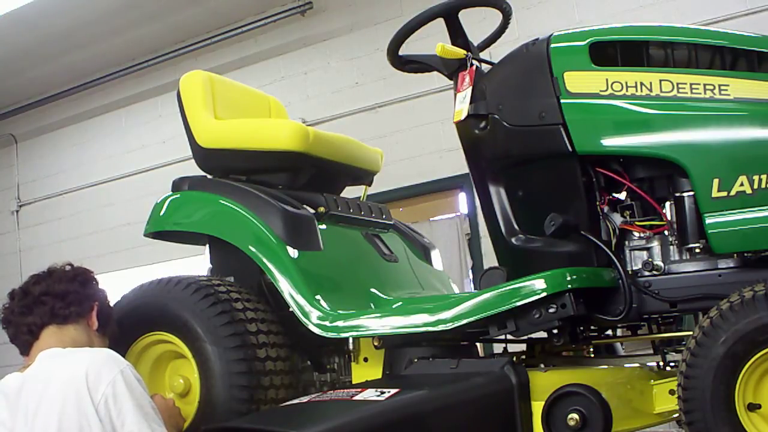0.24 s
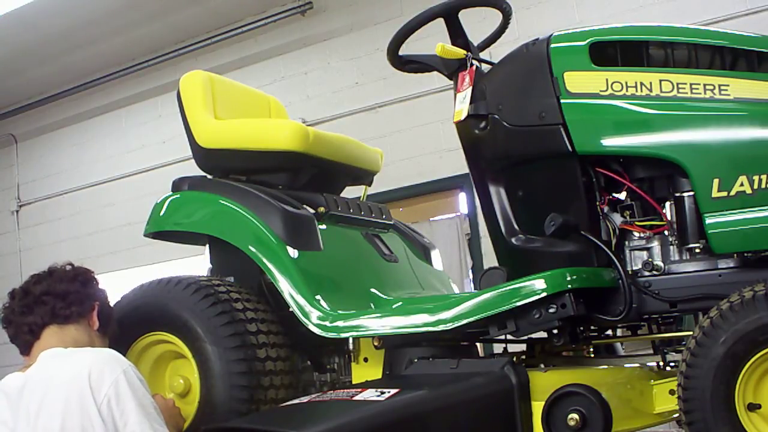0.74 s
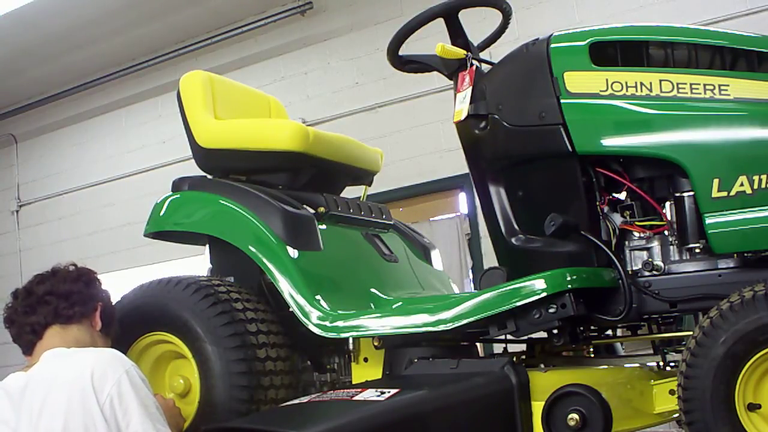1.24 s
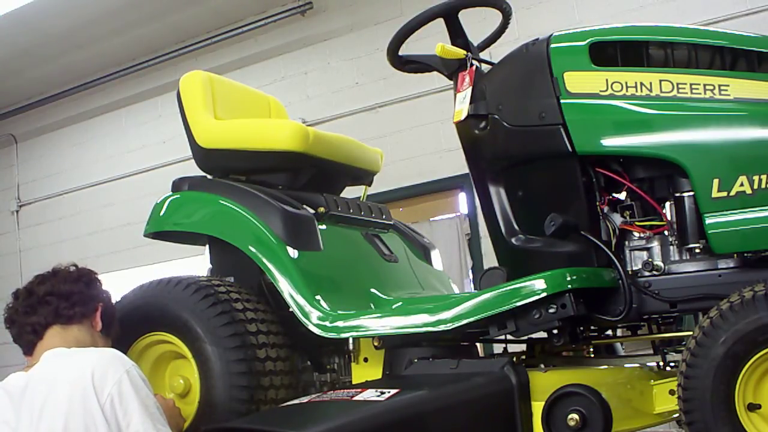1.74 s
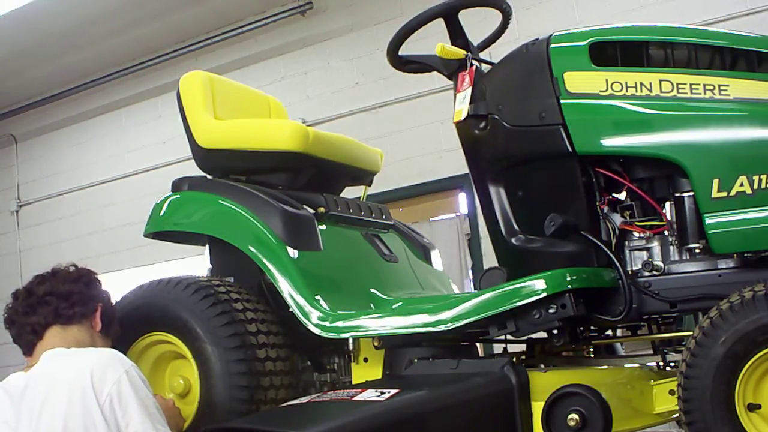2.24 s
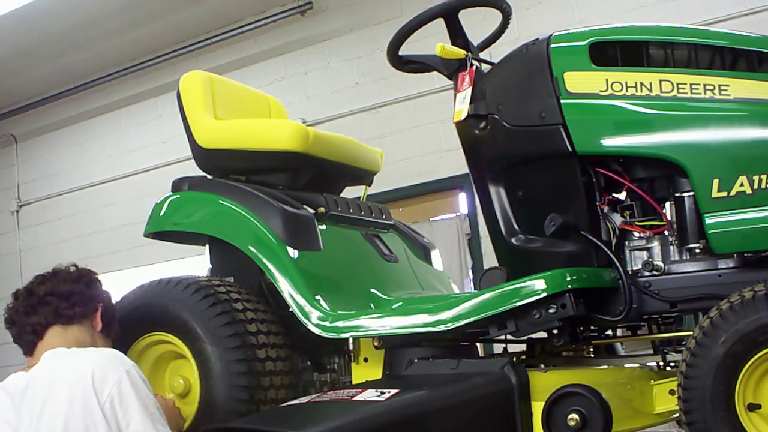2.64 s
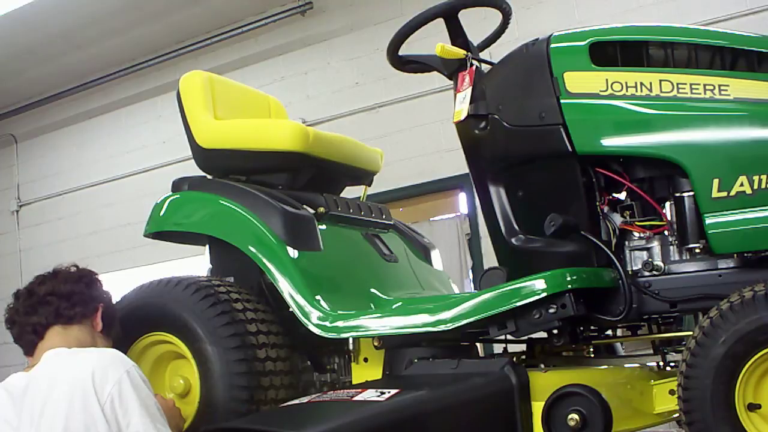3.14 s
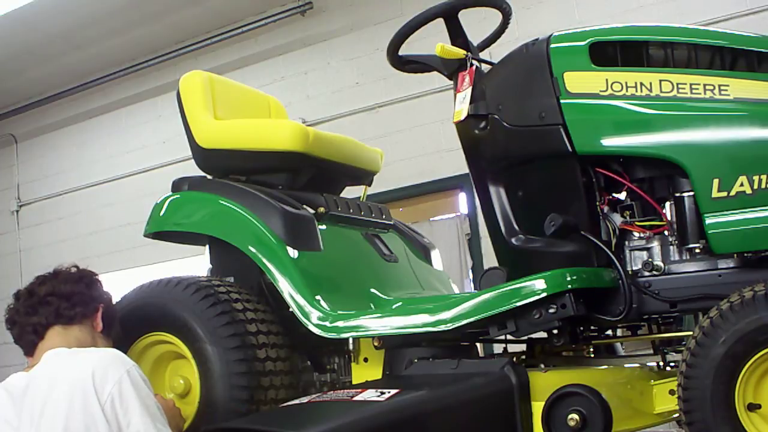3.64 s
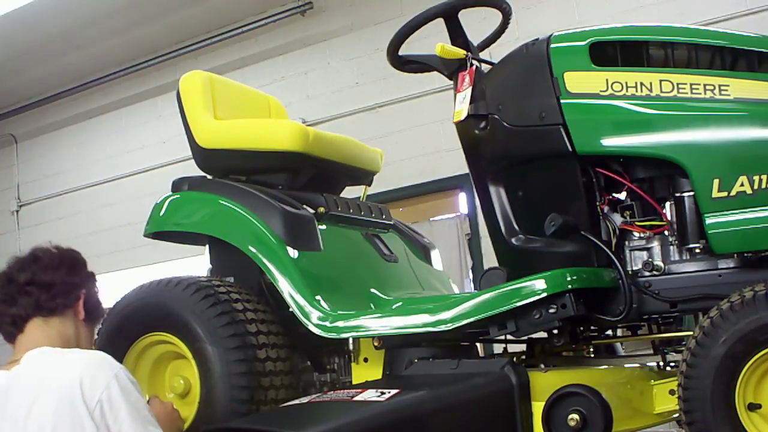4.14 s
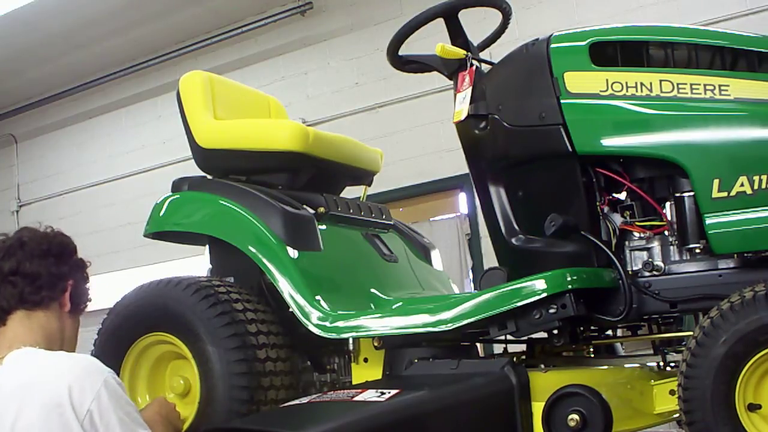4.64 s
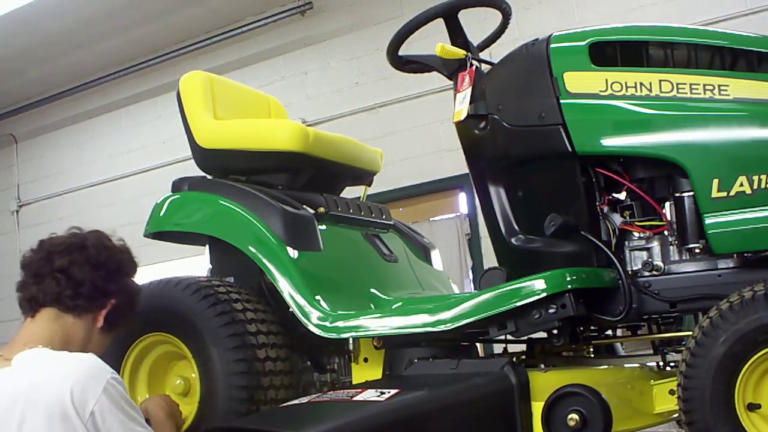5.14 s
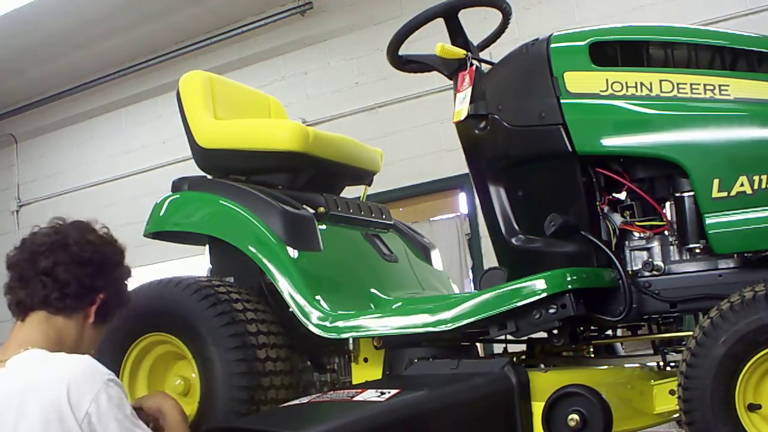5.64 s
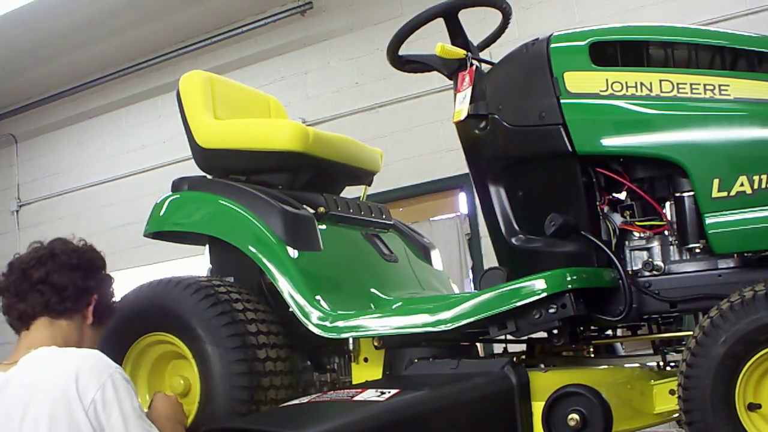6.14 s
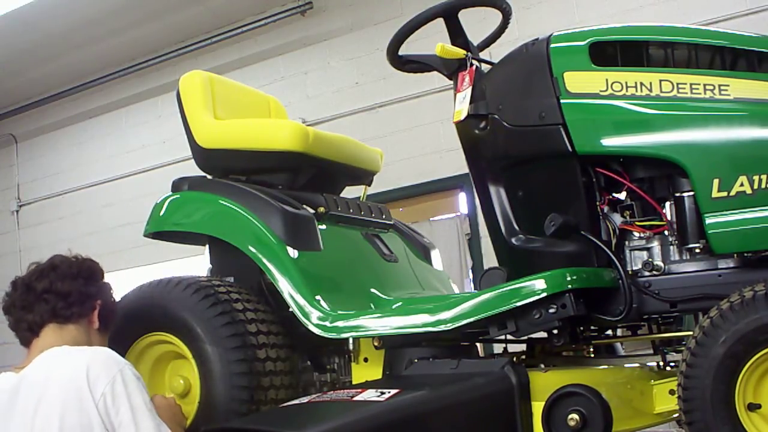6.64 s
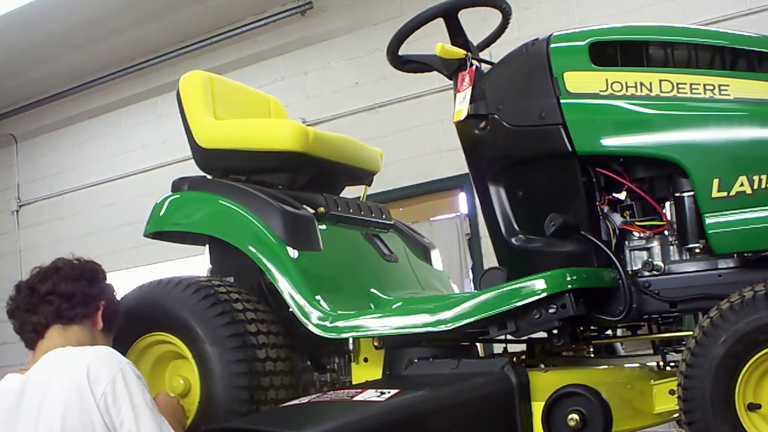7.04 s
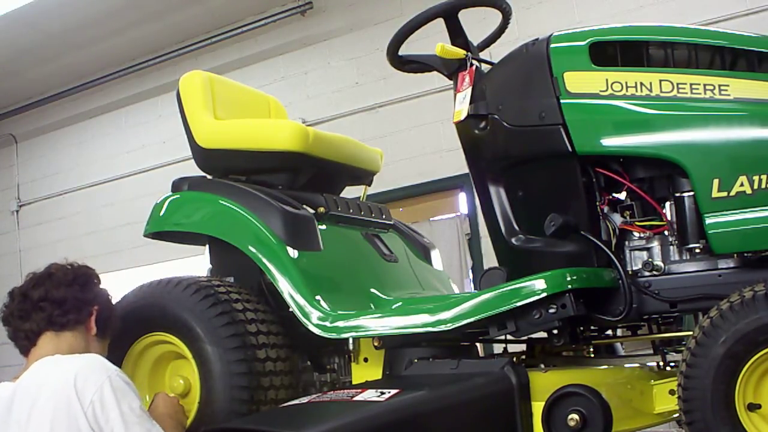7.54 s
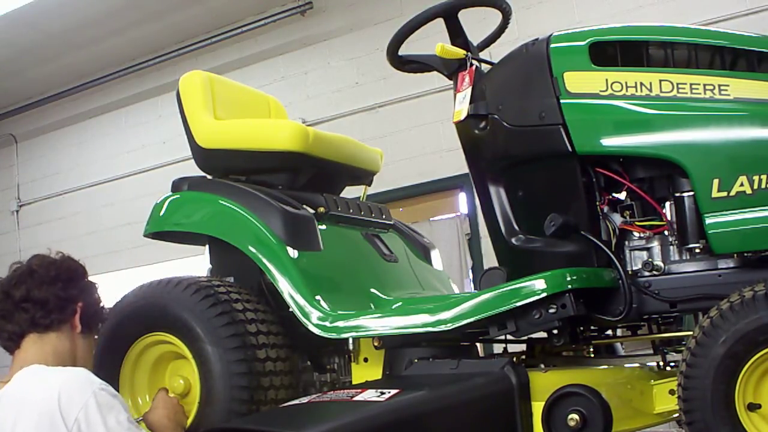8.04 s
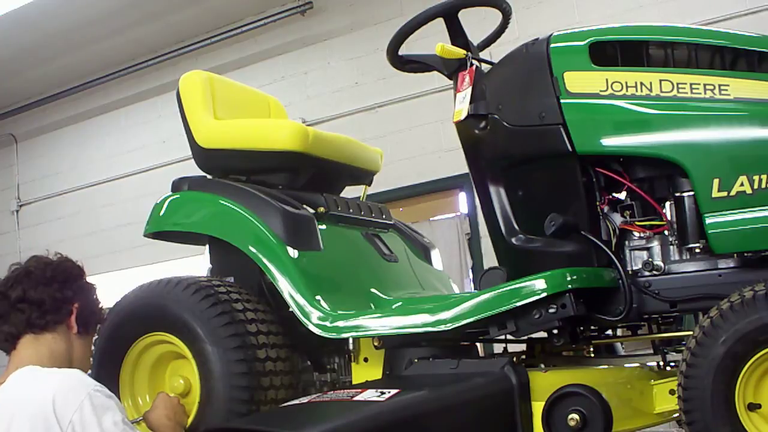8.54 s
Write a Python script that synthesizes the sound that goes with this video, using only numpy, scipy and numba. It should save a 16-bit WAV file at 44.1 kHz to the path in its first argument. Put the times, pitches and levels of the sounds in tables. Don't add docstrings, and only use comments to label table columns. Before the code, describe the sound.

In a hard-walled workshop, a sharp hiss of escaping air stops, puffs once, ticks, then resumes steadily above throbbing fan motors.

```python
import sys
import numpy as np
from scipy import signal
from scipy.fft import rfft, irfft, next_fast_len
from scipy.io import wavfile
from scipy.ndimage import uniform_filter1d
from numba import njit

SR = 44100
rng = np.random.default_rng(int(sys.argv[2]) if len(sys.argv) > 2 else 0)


def volts(x):
    e = np.asarray(x, float) / 20
    return 10 ** e


def transcribe(signal):
    frames = np.atleast_2d(signal).T
    limited = np.clip(frames, -1, 1)
    pcm = np.round(limited * 32767).astype(np.int16)
    wavfile.write(sys.argv[1], SR, pcm)


N = 387198

# (valve opens [s], shuts [s], jet whistle [dB], sag as pressure falls [dB/s])
RELEASES = [
    (-1, 4.08, -33.9, 1.1),
    (5.47, 5.66, -52, 45),
    (6.828, 9, -34, -.4),
]
# (start [s], length [s], extra level [dB])
JET_SURGES = [
    (3.83, 0.3, 7),
    (5.495, .07, 9),
    (6.819, .3, 2.5),
    (7.199, .65, 1.8),
    (8.2, .42, 2.2),
]
# (time [s], whistle centre [Hz])
WHISTLE_CENTRE = [(0, 7210), (3.94, 7580), (4.08, 6850), (5.5, 7080), (6.85, 7020), (7.5, 6880),
                  (7.85, 6720), (8.78, 6760)]
# (frequency [Hz], width [Hz], level [dB])
CHUCK_CAVITIES = [(6220, 370, -6.5), (6740, 320, -1.5), (7360, 750, -4), (7925, 300, 2.5)]
# (frequency [Hz], density [dB per Hz])
STEM_SPECTRUM = [(500, -15.5), (900, -14.5), (1350, 3.5), (1800, -6), (2400, -1), (3200, -4), (4000, -9),
                 (5000, -13.5)]
# (multiple of its speed, level re first [dB])
FAST_PARTIALS = [(3, -28.5), (4, -32.5), (5, -38), (6, -41), (7, -44), (8, -37), (9, -38), (10, -28),
                 (11, -42), (12, -38), (17, -52.5), (19, -45.5), (20, -47.5), (21, -47), (27, -41.5)]
# (multiple of shaft speed, level [dB])
SHAFT_PARTIALS = [(1, -49), (3, -54), (5, -51), (12, -59), (21, -66)]
# (time [s], slower motor level [dB])
BEAT_LOWS = [(-.5, -35), (.23, -35), (.97, -36.5), (1.65, -36.5), (2.25, -34.5), (2.98, -38), (3.73, -34),
             (4.4, -38), (5.13, -36), (5.74, -36.5), (6.51, -35.5), (7.3, -36.5), (8.2, -37.5),
             (9.1, -37.5)]
# (multiple of mains frequency, level [dB])
MAINS_PARTIALS = [(3, -62), (4, -53), (6, -62.5), (8, -65.5)]
# (frequency [Hz], level [dB])
PUMP_NOTES = [(297.7, -59), (1135.5, -66)]
# (frequency [Hz], density [dB per Hz])
SHOP_SPECTRUM = [(20, 3), (70, 1), (105, -2.5), (125, -7), (155, -10), (250, -3), (340, -7.5), (430, -12),
                 (600, -7), (800, -12), (1700, -17.5), (2200, -16), (2800, -20.5), (9000, -26.5)]
# (start [s], end [s], first pitch [Hz], last pitch [Hz], loudest level [dB])
ENGINES = [
    (1, 1.7, 127, 124.5, -37.5),
    (3.5, 5.3, 126, 124.4, -51),
    (-0.6, 1.7, 80.5, 77, -45),
    (3, 3.8, 78, 72, -43),
    (3.8, 5, 74, 81, -53),
    (3.5, 4.5, 99, 120, -52),
    (2.9, 3.7, 38.8, 41.3, -54),
    (2.5, 2.4, 44.3, 48, -47),
]
# (time [s], ring peak [dB], ring [Hz], knock level [dB])
CONTACTS = [
    (5.5353, -34, 6950, -44),
    (5.6536, -47, 7710, -53),
    (6.5064, -33.5, 6230, -53),
    (6.7987, -43.5, 7710, -51),
]
# (frequency [Hz], gain [dB])
MIC_RESPONSE = [(20, -1), (2800, 0), (3500, -4), (3950, -11), (4200, -24.5), (4500, -8.5), (5400, -1.5),
                (7500, 2.5), (7800, 0.5), (8000, -1.5)]
# (frequency [Hz], gain [dB])
CONVERTER_SMOOTHING = [(7000, 0), (7700, -2), (8000, -7.5), (8290, -10.5), (8500, -16.5), (8750, -26),
                       (9000, -37.5), (9250, -60)]

FAST_HZ, SLOW_SHAFT_HZ, MAINS_HZ = 57.665, 28.12, 60.01
FAST_DB = -25
THROB_S = .195


def level(x, db):
    return x * volts(db) / np.sqrt(np.mean(x ** 2))


def colour(x, points):
    size = next_fast_len(len(x))
    hz, db = np.transpose(points)
    log_hz = np.log(np.fft.rfftfreq(size, 1 / SR) + 1)
    gain = volts(np.interp(log_hz, np.log(hz), db))
    return irfft(rfft(x, size) * gain, size)[:len(x)]


def walk(rate):
    hold = max(int(SR / rate), 1)
    steps = np.repeat(rng.standard_normal(N // hold + 1), hold)
    slewed = uniform_filter1d(uniform_filter1d(steps, hold), hold)
    return np.sqrt(2) * slewed[:N]


@njit
def svf(x, hz, width):
    y, band, low = np.empty(len(x)), 0., 0.
    for i in range(len(x)):
        g, k = np.tan(np.pi * hz[i] / SR), width / hz[i]
        v = (band + g * (x[i] - low)) / (1 + g * (g + k))
        band, low, y[i] = 2 * v - band, low + 2 * g * v, k * v
    return y


def tone(turns, db):
    return np.sqrt(2) * volts(db) * np.sin(2 * np.pi * turns)


def gate(t, start, end, fade):
    rise = np.clip((t - start) / fade + (start <= 0), 0, 1)
    fall = np.clip((end - t) / fade + 1, 0, 1)
    return rise * fall


def flow(t):
    open_s, open_db = .03, -24
    surge = np.zeros(N)
    for start, length, db in JET_SURGES:
        surge += db * np.sin(np.pi * np.clip((t - start) / length, 0, 1))
    releases = []
    for opens, shuts, db, sag in RELEASES:
        pin_db = open_db * np.clip(1 - (t - opens) / open_s, 0, 1)
        gain = gate(t, opens, shuts, .008) * volts(db + pin_db)
        releases.append((gain, surge - sag * (np.clip(t, opens, shuts) - opens)))
    return releases


def valve(t):
    lower_db, lower_share = -10.7, .1
    stem_db, stem_share = -15, .35
    lower_db_per_khz = 8
    flutter = volts(0.84 * walk(300) + 0.89 * walk(40) + 0.49 * walk(8))
    eddies, lower, stem = rng.standard_normal((3, N))
    lower = level(svf(lower, np.full(N, 5600.), 2700.0), 0) * volts(.5 * walk(16))
    stem = level(colour(stem, STEM_SPECTRUM), 0) * volts(0.51 * walk(7.7))

    rings = np.zeros(N)
    for hz, width, db in CHUCK_CAVITIES:
        rings += volts(db + .8 * walk(31)) * svf(eddies, np.full(N, 1. * hz), 1. * width)
    centre = np.interp(t, *np.transpose(WHISTLE_CENTRE))
    whistle = level(svf(eddies + volts(3.0) * rings, centre, 2400.), 0) * flutter
    lower = lower * volts(lower_db_per_khz * (centre - centre[0]) / 1000)

    out = np.zeros(N)
    for gain, db in flow(t):
        jet = volts(db) * whistle + volts(lower_db + lower_share * db) * lower
        out += gain * (jet + volts(stem_db + stem_share * db) * stem)
    return out


def room(x, t60, direct_db, wet_db):
    age = np.arange(SR) / SR
    tail = rng.standard_normal(SR) * np.exp(-np.log(1000) * age / t60) * np.clip(age / 0.034, 0, 1)
    tail /= np.sqrt(np.sum(tail ** 2))
    lead = np.concatenate([x[SR:0:-1], x])
    wet = signal.fftconvolve(lead, tail)[SR:SR + N]
    return volts(direct_db) * x + volts(wet_db) * wet


def duck_db(t):
    threshold_db, slope, memory_s = -36.1, .9, .8
    power = sum((gain * volts(db)) ** 2 for gain, db in flow(t))
    keep = np.exp(-1 / (memory_s * SR))
    heard_db = 10 * np.log10(signal.lfilter([1 - keep], [1, -keep], power) + 1e-12)
    return -slope * np.maximum(heard_db - threshold_db, 0)


def motors(t):
    crest_db = -0.7
    fast_octave_db, slow_octave_db = -22, -30
    slow_octave_turns = .625
    low_s, low_db = np.transpose(BEAT_LOWS)
    behind = np.interp(t, low_s, np.arange(len(low_s)) + .5)
    behind = uniform_filter1d(behind, SR // 5)
    fast = FAST_HZ * (t - THROB_S)
    slow = fast - behind
    fast_db = FAST_DB + duck_db(t)
    slow_db = np.interp(t, low_s, low_db) + crest_db * np.cos(2 * np.pi * behind)

    out = tone(fast, fast_db) + tone(slow, slow_db)
    out += tone(2 * fast, fast_db + fast_octave_db)
    out += tone(2 * slow + slow_octave_turns, fast_db + slow_octave_db)
    for k, db in FAST_PARTIALS:
        out += tone(k * fast + rng.random(), fast_db + db + .5 * walk(2))
    shaft = SLOW_SHAFT_HZ * t + 0.0092 * walk(.7)
    for k, db in SHAFT_PARTIALS:
        out += tone(k * shaft + rng.random(), db + 1.2 * walk(2.4))
    return out


def lamps(t):
    out = tone(2 * MAINS_HZ * (t - THROB_S), -49.5)
    lines = [(k * MAINS_HZ, db) for k, db in MAINS_PARTIALS] + PUMP_NOTES
    for hz, db in lines:
        out += tone(hz * t + rng.random(), db + .5 * walk(10))
    return out


def air_handling():
    rush = level(colour(rng.standard_normal(N), SHOP_SPECTRUM), -41.5)
    bass = colour(rush, [(20, 0), (700, 0), (1000, -40)])
    treble = room(rush - bass, t60=0.54, direct_db=-5, wet_db=-1.5)
    return bass * volts(.8 * walk(3.005)) + treble * volts(0.43 * walk(2.4))


def traffic(t):
    thud_s, thud_hz, thud_db, thud_width_s = 2.02, 21, -34, .12
    pass_db = 12
    out = tone(thud_hz * t, thud_db) * np.exp(-((t - thud_s) / thud_width_s) ** 2)
    for start, end, first_hz, last_hz, db in ENGINES:
        way = np.clip((t - start) / (end - start), 0, 1)
        edge = np.clip(np.minimum(t - start, end - t) / 0.073, 0, 1)
        turns = np.cumsum(first_hz + (last_hz - first_hz) * way) / SR
        out += edge * tone(turns, db - pass_db * (2 * way - 1) ** 2)
    return out


def ticks(t):
    out = np.zeros(N)
    scuff = [(400, -25), (800, -0.5), (1400, -3.5), (3500, -4.0), (6000, -10)]
    knock = level(colour(rng.standard_normal(N), scuff), 0)
    for s, db, hz, knock_db in CONTACTS:
        age = np.maximum(t - s, 0)
        ring = age / .0005 * np.exp(1 - age / 0.00045) * np.sin(2 * np.pi * hz * age)
        swell = np.exp(-np.abs(t - s) / np.where(t < s, .012, .08))
        out += volts(db - 4.0) * ring + volts(knock_db) * swell * knock
    return out


def mirror(x):
    fold_hz = 8000
    size = SR * (N // SR + 1)
    fold = fold_hz * size // SR
    bins = rfft(x, size)
    bins[fold:2 * fold] = np.conj(bins[fold:0:-1])
    bins[2 * fold:] = 0
    return colour(irfft(bins, size)[:N], CONVERTER_SMOOTHING)


def scene():
    t = np.arange(N) / SR
    contacts = ticks(t)
    near = room(valve(t) + volts(-13) * contacts, t60=0.82, direct_db=-2.5, wet_db=-4.5) + contacts
    background = lamps(t) + traffic(t) + air_handling()
    return (near + motors(t) + volts(duck_db(t)) * background)[None]


def top_cut(x):
    return signal.sosfilt(signal.butter(12, 9070, fs=SR, output="sos"), x)


def record(dry):
    hiss = level(colour(rng.standard_normal(N), [(20, 7), (7500, -0.5), (8000, -9)]), -64)
    whine = tone(7713.6 * np.arange(N) / SR, -62.5)
    mix = mirror(colour(dry[0], MIC_RESPONSE) + hiss + whine)
    return top_cut(mix[None])


dry = scene()
out = record(dry)
transcribe(out)
```